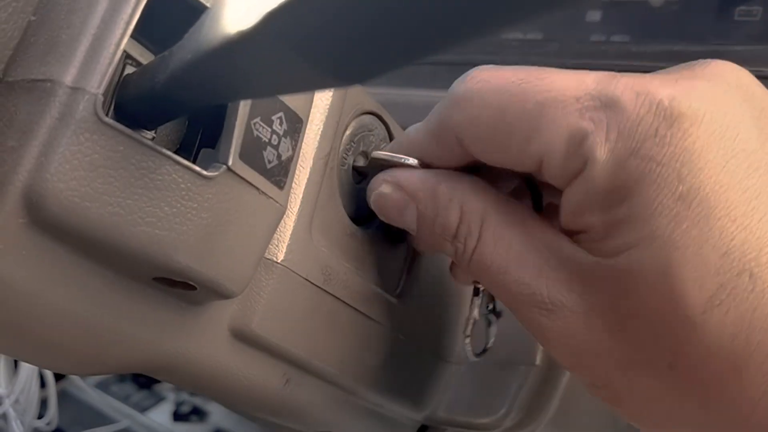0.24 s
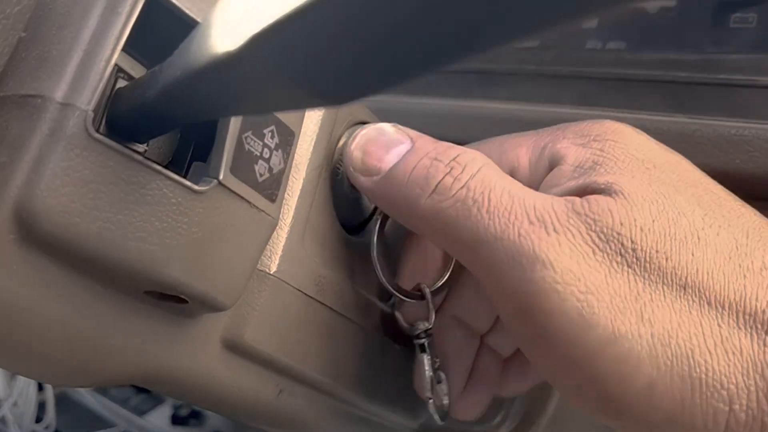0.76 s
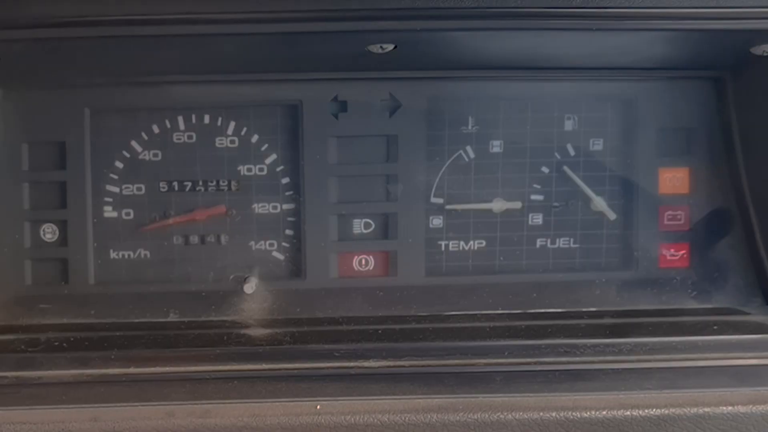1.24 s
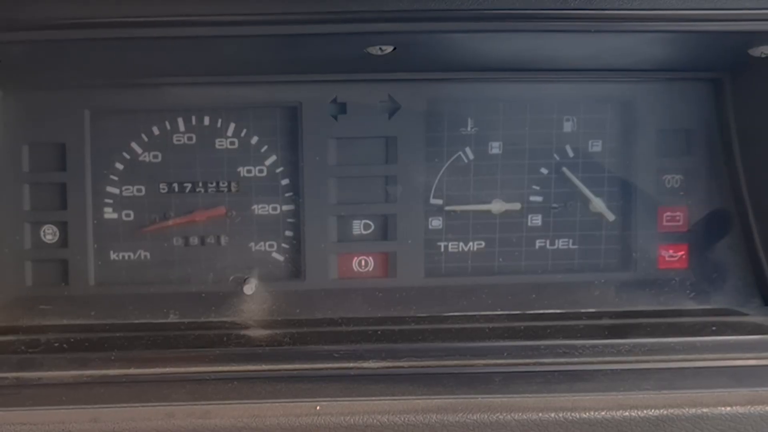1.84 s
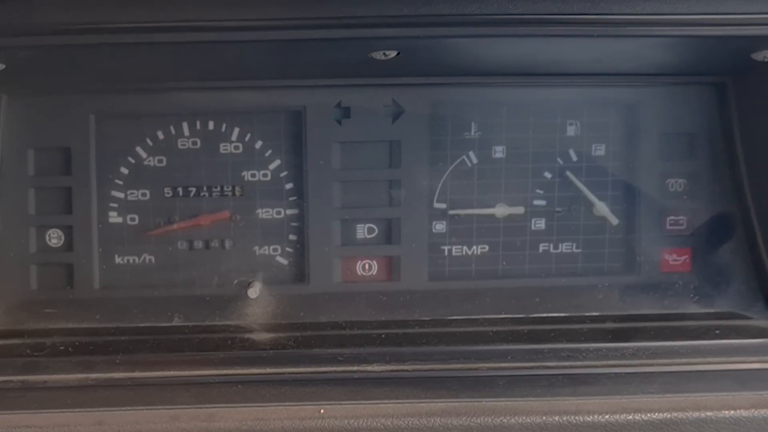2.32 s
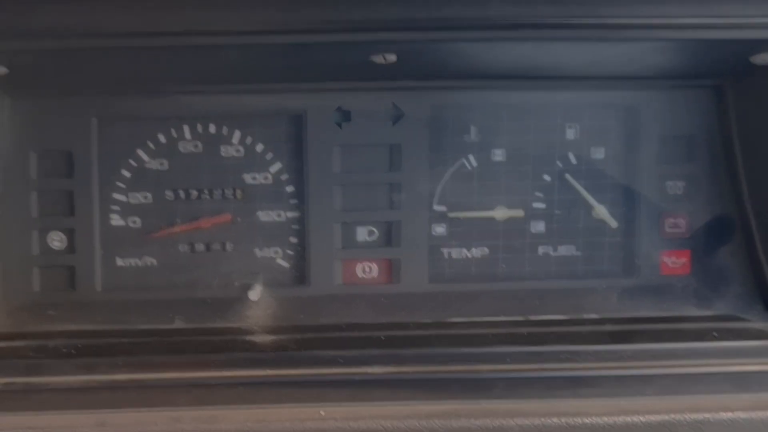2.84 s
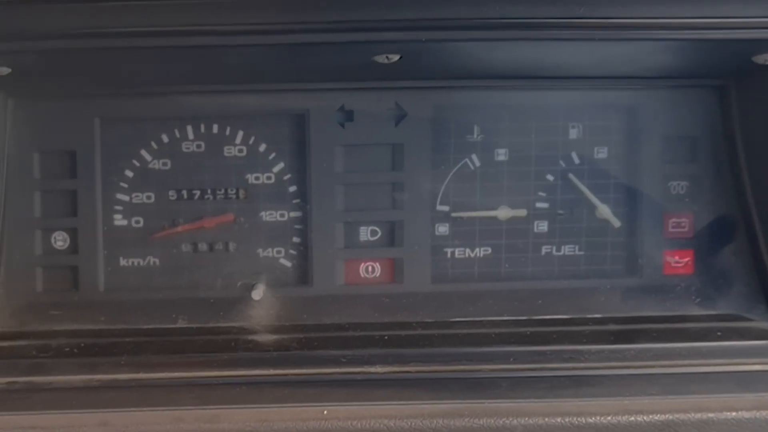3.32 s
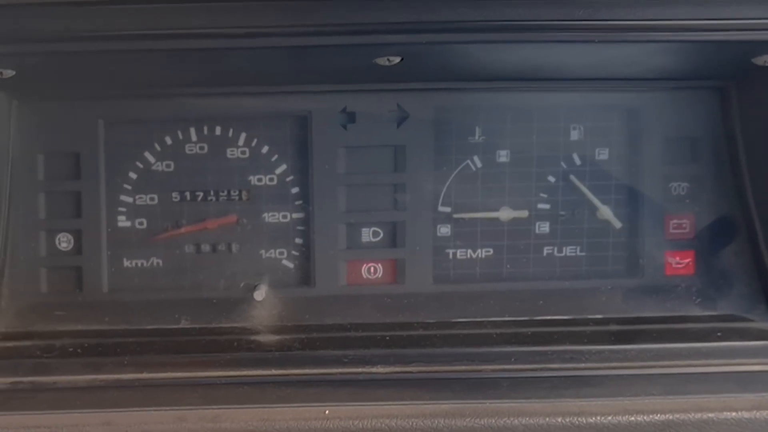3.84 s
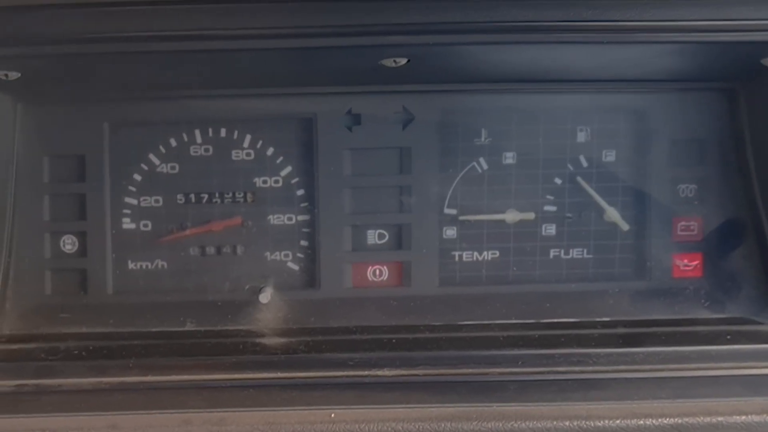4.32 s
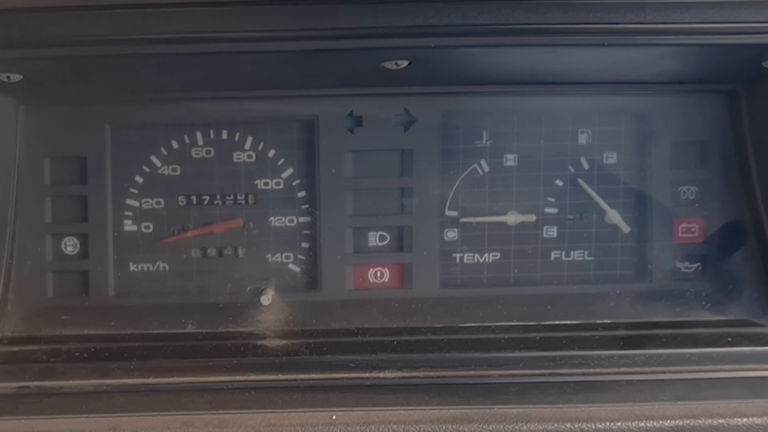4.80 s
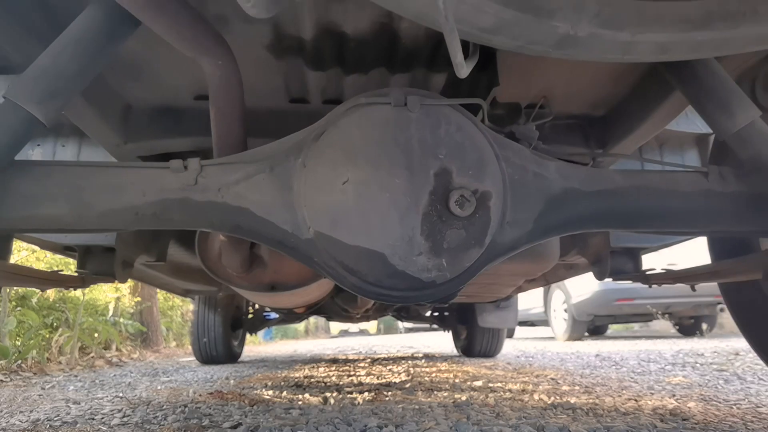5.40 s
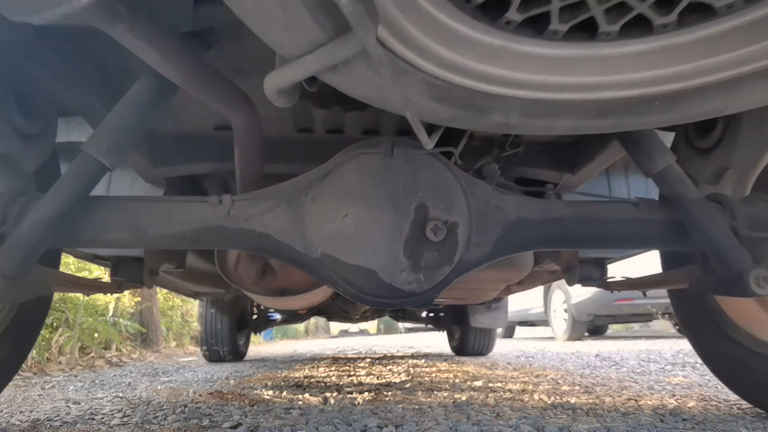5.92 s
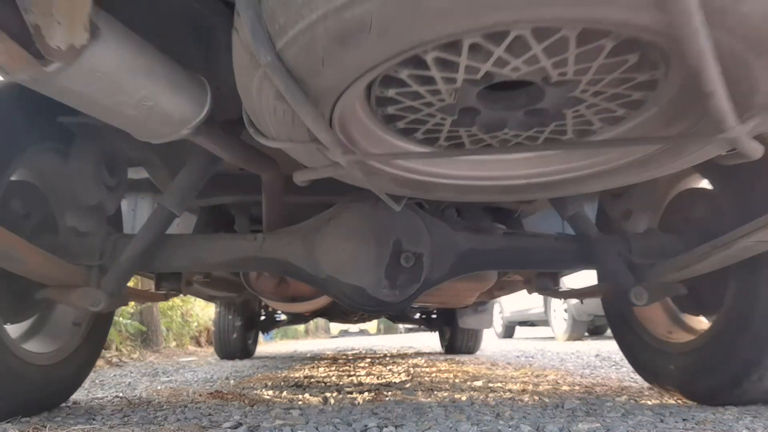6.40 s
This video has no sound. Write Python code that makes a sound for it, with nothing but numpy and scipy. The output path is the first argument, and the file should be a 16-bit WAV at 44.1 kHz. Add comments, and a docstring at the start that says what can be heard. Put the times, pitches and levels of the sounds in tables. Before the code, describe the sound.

Close inside an old van, a key and ring click faintly, then the switch snaps sharply. A relay clunks in the dashboard, the starter grinds briefly, and the engine catches with a booming flare. It sinks into a thudding idle with a loose tappet ticking. The final view crossfades beneath the rear axle, where exhaust drones and puffs among rattling metal.

```python
"""In the cab of an old van a key clicks in the ignition lock, a relay clunks in the dashboard, and the starter
whirrs briefly until the four-cylinder engine catches and settles to idle: body boom from firing harmonics, thud
and clatter from noise shaped by each stroke, a loose tappet from struck modes about once a cycle.
Near the end the cab crossfades to a view under the rear axle, with exhaust puffs close by."""
import sys
import numpy as np
from scipy import signal
from scipy.fft import rfft, irfft, next_fast_len
from scipy.io import wavfile
from scipy.ndimage import uniform_filter1d

SR = 44100
rng = np.random.default_rng(int(sys.argv[2]) if len(sys.argv) > 2 else 0)


def store_pcm(level_fs):
    """Save levels as 16-bit WAV."""
    pcm = np.round(np.clip(level_fs, -1, 1) * 32767).astype(np.int16)
    wavfile.write(sys.argv[1], SR, np.atleast_2d(pcm).T)


N = 293706
TIME = np.arange(N) / SR

# Colour of the murmur outside the van. Each row: frequency in Hz, relative gain in dB.
OUTSIDE_COLOUR = [(100, 3.5), (170, -12.5), (230, 14), (310, -7), (400, -3.5), (600, -10), (850, -5),
                  (1300, -14.5), (2100, -15), (3800, -27), (6000, -18.5), (7200, -19), (8400, -14),
                  (10500, -27.5), (12000, -38), (16000, -38)]
# Colour of the low rumble. Each row: frequency in Hz, relative gain in dB.
RUMBLE_COLOUR = [(20, -25), (50, 3.5), (80, 2), (130, -6), (220, -12), (400, -28.5)]
# Moments when the rumble swells. Each row: centre in seconds, half length in seconds, relative level in dB.
RUMBLE_SWELLS = [(0.286, 0.059, -41.5), (0.675, 0.028, -36), (0.85, 0.018, -38), (1.628, 0.056, -39)]
# The murmur drops when the relay clunks; in the view under the axle the background is weaker.
MURMUR_DB, MURMUR_DROP_DB, RUMBLE_DB, BACKGROUND_UNDER_DB = -44, -4, -39, -3

# Key, key ring and switch contacts, close in the cab. Each row: snap in seconds, relative level in dB,
# left minus right in dB, tail t60 in seconds, dashboard body in dB, bright edge in dB.
KEY_CLICKS = [(0.184, -44, 6, 0.04, 11, 21), (0.332, -40.5, 6, 0.045, 11, -12),
              (0.482, -24.5, 5.5, 0.033, -16, 6), (0.491, -34, 1, 0.2, -7, 3), (0.55, -27, 5, 0.12, 9, -14),
              (0.563, -38, 0, 0.074, 16, -14), (0.647, -35, 2, .025, -3, 2), (0.807, -25.5, 3, 0.08, -4, 9),
              (0.816, -26, 2, 0.12, 0, -3), (0.928, -32, 3.5, 0.13, 9.5, -8),
              (0.947, -31.5, 3, 0.12, -2, 0), (0.98, -31.5, 2, 0.1, 4.5, -10),
              (1.008, -45.5, 6, 0.066, 15.5, -10), (1.142, -19, 8, 0.023, 2.5, -2),
              (1.151, -8.5, -2, 0.048, -12, -12), (1.163, -17.5, -2, 0.12, -17, -20),
              (1.188, -11, 1, 0.092, -5.5, 4.5), (1.323, -39, 1, 0.25, 5, 10),
              (1.762, -18.5, -3, 0.088, -0.5, -20), (2.163, -12.5, 2, 0.092, -23, -16),
              (2.227, -26.5, 0, 0.11, 6.5, -6)]
# First the starter pinion on the ring gear, then probably the released key and its ring, later sharp metallic
# clashes. Each row: snap in seconds, relative level in dB, left minus right in dB, tail t60 in seconds,
# body in dB, bright edge in dB.
CLASHES = [(2.247, -12.5, -0.5, 0.16, 6, 1), (2.275, -9, -2, 0.076, 3, -6),
           (2.99, -14.5, 1, 0.25, -23, -10), (3.03, -22, 3, 0.17, -5, 0), (5.513, -18, -1, 0.08, 3, -8),
           (5.589, -13, 0, 0.08, 0.5, -11)]
# Colour of the lock steel in a click. Each row: frequency in Hz, relative gain in dB.
LOCK_COLOUR = [(3000, -26.5), (4350, -14), (4900, -3), (7000, 0), (8400, 6.5), (9600, -1), (11500, -16),
               (16000, -48)]
# Colour of the dashboard behind a click. Each row: frequency in Hz, relative gain in dB.
DASH_COLOUR = [(150, -5), (600, -2.5), (1000, -17), (1350, -4.5), (2000, -3), (2600, -2), (3600, -5),
               (5500, -7.5), (9000, -79)]
# Colour of a click's bright edge. Each row: frequency in Hz, relative gain in dB.
EDGE_COLOUR = [(7000, -30), (10500, -4), (12500, -1), (15000, 0), (16000, -2)]
# Ringing of the lock. Each row: frequency in Hz, width in Hz, relative level in dB.
LOCK_MODES = [(5400, 300, -6), (5910, 120, -1.5), (6600, 74, -7), (7900, 48, -18), (8550, 69, -20)]
# Ringing of the panel around a click. Each row: frequency in Hz, width in Hz, relative level in dB.
PANEL_MODES = [(1320, 73, 0), (1984, 56, 0), (2860, 16, 0)]
# A click is a crackle of tiny contacts of uneven strength; its bright edge dies first.
GRAINS_PER_S, GRAIN_SPREAD_DB, EDGE_FALL_DB_PER_S = 1400, 3, 120

# The lock barrel. Each row: frequency in Hz, relative level in dB, t60 in seconds.
BARREL_MODES = [(1330, -12, .13), (1850, 3, 0.085), (2110, 3, .11), (2853, -17, 0.11), (3408, -8, .05)]
# The switch detent. Each row: frequency in Hz, relative level in dB, t60 in seconds.
DETENT_MODES = [(1340, -4, .08), (1980, 0, .07), (2970, -5, .09), (3241, 3, .08), (3515, -1.5, 0.092),
                (4330, 4, .06)]
# The return spring of the ignition switch. Each row: frequency in Hz, level in dB, t60 in seconds.
SPRING_MODES = [(5050, -24, .06), (5250, -21, .06), (5520, -26, .05)]
# The key seats in the barrel. Each row: start in seconds, level in dB.
SEATINGS = [(0.551, -42), (0.563, -39)]
# The switch snaps over its detents. Each row: start in seconds, level in dB.
SNAPS = [(1.143, -45), (1.189, -32)]
SPRING_S = 2.163  # the key turns to start

# Relay clunk in the dashboard. Each row: frequency in Hz, relative level in dB, t60 in seconds.
CLUNK_MODES = [(142, -10, 0.36), (226, -4.5, 0.22), (314.6, -1, 0.21), (370, -3, 0.16), (612, -7.5, 0.087),
               (1040, -19.5, 0.24), (1970, -26, 0.25), (2050, -29, 0.4), (2110, -27, 0.25)]
# Colour of the loose dashboard trim. Each row: frequency in Hz, relative gain in dB.
TRIM_COLOUR = [(130, -1), (350, 7.0), (500, -7.5), (700, -3), (1100, -12), (2200, -16.0), (4500, -22.0)]
CLUNK_S, CLUNK_DB, TRIM_DB = 1.761, -17.5, -26.5

# Starter speed. Each row: time in seconds, mean gear mesh in Hz.
MESH = [(2.25, 790), (2.33, 740), (2.415, 657), (2.45, 1040), (2.515, 1012), (2.555, 809), (2.585, 784),
        (2.62, 645)]
# Compressions that load the starter. Each row: centre in seconds, half length in seconds, load in dB.
COMPRESSIONS = [(2.28, 0.019, -2), (2.393, 0.027, -3.5), (2.563, 0.024, 0.5)]
# The pinion scrapes as it overruns between compressions.
# Each row: centre in seconds, half length in seconds, level in dB.
OVERRUNS = [(2.362, .025, -35), (2.525, 0.038, -32.5)]
# Harmonics of the gear whine. Each row: multiple of the mesh rate, mean relative level in dB.
WHINE_HARMONICS = [(1, 0), (2, -1), (3, -10)]
# Colour of the starter housing. Each row: frequency in Hz, relative gain in dB.
HOUSING_COLOUR = [(600, 4), (780, 8), (1030, -1), (1350, -1), (1620, 0), (2050, 4), (2500, -10)]
# Colour of the grinding teeth. Each row: frequency in Hz, relative gain in dB.
GRIND_COLOUR = [(300, -42), (600, 2), (780, 12), (980, -2), (1380, 2), (1700, -2), (2300, -13), (3500, -15)]
# Ringing of the ring gear. Each row: frequency in Hz, width in Hz, relative level in dB.
RING_GEAR_MODES = [(3080, 130, -1), (4100, 200, -3), (4750, 200, -3), (5200, 170, 3), (5780, 170, 7)]
PINION_TEETH = 9
# Starter gears: dB running free, dB added as gain in proportion to load.
WHINE_DB, GRIND_DB, SCRAPE_DB = (-37, -32), (-43, -30), (-42, -41)
START_S, STARTER_HOLD_S, RUN_DOWN_DB_PER_S = 2.25, 0.335, 200
# Armature hum: strong while the motor breaks the engine loose.
HUM_HZ, HUM_DB, HUM_LOAD_DB = 151, -16.5, -32.5
HUM_RISE_S, HUM_HOLD_S, HUM_FALL_DB_PER_S = 0.043, 0.052, 225

# Engine speed in firings per second: runs up from cranking, flares, sinks to idle, later picks up a little.
CRANK_RATE, FLARE_RATE, IDLE_RATE, FAST_IDLE_RATE = 9.671, 28.148, 24.222, 26.661
RUN_UP_S, SINK_S, PICK_UP_S, PICK_UP_LENGTH_S = 0.5, 0.568, 5.633, 0.788
# Engine effort: the cylinders catch, pull hard through the flare, then ease off.
CATCH_S, CATCH_LENGTH_S, EASE_S, EASE_LENGTH_S = 2.585, 0.16, 3.19, 0.22
# Levels in the cab: dB at cranking, flare and idle.
BOOM_DB, THUD_DB, CLATTER_DB = (-30.5, -15.5, -18), (-33.5, -23.5, -28.5), (-40.5, -40.5, -41.5)
WHIRR_DB = (-60, -46, -50.5)  # valve gear whirring in the cover
VALVES_DB, SHAKE_DB, THUD_SCATTER_DB = -50, -38.5, 3
# The block jolts on its mounts as the starter takes hold.
JOLT_DB, JOLT_FALL_DB_PER_S = -20, 116
# Boom in the cab. Each row: multiple of the firing rate, mean relative level in dB.
CAB_ORDERS = [(1, -23), (2, 3), (3, 3), (5, -1), (7, -13), (8, -24.5), (9, -26)]
# Colour of the block's thud in the cab. Each row: frequency in Hz, relative gain in dB.
CAB_THUD_COLOUR = [(25, -20), (45, 0), (90, 2.5), (160, 4.5), (230, -2), (360, -12), (460, -21.5),
                   (580, -16), (900, -50), (1500, -56.5)]
# Colour of the block's clatter in the cab. Each row: frequency in Hz, relative gain in dB.
CAB_CLATTER_COLOUR = [(400, 3.5), (800, 5.5), (1300, -1.5), (1800, 3), (2700, -2.5), (3900, -9.5),
                      (5800, -6), (8300, -3.5), (10000, -11.5), (12000, -26), (16000, -37)]
# Colour of the shaken cab floor. Each row: frequency in Hz, relative gain in dB.
SHAKE_COLOUR = [(150, -6), (230, 0), (290, -4), (350, -2), (440, -17)]
# Colour of the valve contacts. Each row: frequency in Hz, relative gain in dB.
VALVE_COLOUR = [(1900, 1.0), (2400, 7.0), (3200, 4.0), (3900, -21)]
# Ringing of the tappet cover. Each row: frequency in Hz, width in Hz, relative level in dB.
COVER_MODES = [(1686, 47, 7), (1765, 44, 6), (1576, 63, 1.5), (2290, 240, -20)]

# Colour of the intake hiss. Each row: frequency in Hz, relative gain in dB.
INTAKE_COLOUR = [(1500, -16), (3000, -16), (4200, -17.5), (5200, -9.5), (6200, -4), (7000, -9.5),
                 (7900, -1.5), (9500, -11.5), (11000, -20.5), (12200, -35), (16000, -38)]
# Brief hiss swells: two around the starter, then probably the key springing back and its ring sliding.
# Each row: centre in seconds, half length in seconds, level in dB.
HISS_SWELLS = [(2.381, 0.037, -33.5), (2.515, 0.052, -26), (3.042, 0.04, -29.5)]
# Intake hiss: loud while cranking, steady through the flare, then dying away.
HISS_CRANK_DB, HISS_FLARE_DB, HISS_FADES_S, HISS_FALL_DB_PER_S = -29.5, -31, 2.947, 22

# Tailpipe drone. Each row: multiple of the firing rate, mean relative level in dB.
TAIL_ORDERS = [(2, -24), (3, -5), (4, -9.5), (5, 3), (6, -4.5), (7, -3), (9, -9), (10, -19), (12, -14)]
# Colour of the exhaust puffs. Each row: frequency in Hz, relative gain in dB.
PUFF_COLOUR = [(50, -46), (95, -5), (150, 0.5), (230, -4), (330, -7.5), (420, -17), (520, -12),
               (720, -20.5), (950, -26), (1600, -27)]
# Colour of the clatter under the axle. Each row: frequency in Hz, relative gain in dB.
TAIL_CLATTER_COLOUR = [(400, 1), (900, -4), (1250, 6), (1600, 3.5), (2080, 6), (2600, 4), (3200, 2.5),
                       (4000, 1.5), (6000, -40)]
# Colour of the gas hiss. Each row: frequency in Hz, relative gain in dB.
TAIL_HISS_COLOUR = [(2500, -56), (4000, -10), (5600, -1), (7000, 1), (8500, 2.5), (10000, -4), (12000, -16),
                    (16000, -23.5)]
# Ringing of the underbody sheet metal. Each row: frequency in Hz, width in Hz, relative level in dB.
SHEET_MODES = [(502, 29, 8), (654, 57, 6.5), (775, 41, 3.5), (1094, 37, 5), (1710, 23, 0.5), (2090, 45, -6)]
# Brackets and heat shield under the floor. Each row: frequency in Hz, width in Hz, relative level in dB.
BRACKET_MODES = [(1340, 130, -5), (1530, 90, -1), (1800, 200, -1), (2060, 110, 4), (2230, 200, -1),
                 (2560, 160, -5), (2950, 250, -7)]
DRONE_DB, PUFFS_DB, TAIL_CLATTER_DB, SHEET_DB, KNOCKS_DB = -18, -21.5, -39.5, -33, -31.3  # before the mix
# While the two views overlap, the strokes underneath lag those in the cab; the lag then closes.
UNDER_LAG_FIRINGS, LAG_CLOSES_S, LAG_CLOSING_LENGTH_S = 0.38, 5.31, 0.23

# Ticks of the loose tappet, some with a second tick after them.
# Each row: start in seconds, relative tick level in dB, relative floor thump in dB.
TICKS = [(2.9484, -31.5, -31), (2.9846, -36, -30), (3.019, -35, -36), (3.1457, -35, -26),
         (3.1806, -41, -27), (3.3083, -32, -21), (3.4764, -35, -21.5), (3.6423, -33.5, -24),
         (3.677, -36, -40), (3.8087, -30.5, -22), (3.9733, -29.5, -24), (4.1372, -29, -24),
         (4.3006, -36, -24), (4.4678, -29, -23), (4.631, -37, -31), (4.6707, -34.5, -37), (4.985, -30, -30),
         (5.0318, -30, -31), (5.1135, -27, -26)]
# The cab floor, thumped with each tick. Each row: mean frequency in Hz, relative level in dB, t60 in seconds.
FLOOR_MODES = [(232, 0, .11), (335, -6, .1), (385, -11, .08)]
TAPPET_RISE_S, TAPPET_T60_S, TAPPET_DETUNE = 0.002, 0.085, 0.012  # detune as a fraction

# Crossfade from the cab to a view under the rear axle; the underside then grows weaker.
UNDER_S, UNDER_FADE_S, UNDER_LEAK_DB = 4.67, 0.86, -40
CAB_OUT_S, CAB_FADE_S, CAB_LEAK_DB = 5.51, 0.097, -25
UNDER_DB, UNDER_WEAKENS_DB = 0.5, -2.5
TOP_HZ = 16400


def undb(db):
    """Decibels to gain."""
    return 10 ** (np.asarray(db) / 20)


def unit(x):
    """Scale to rms 1."""
    return x / np.sqrt(np.mean(x ** 2) + 1e-18)


def pan(db):
    """Left and right gains for a left minus right level difference."""
    return undb(np.array([[db], [-db]]) / 2)


def ramp(start, length):
    """A straight rise from 0 to 1."""
    return np.clip((TIME - start) / length, 0, 1)


def envelope(start, attack, hold, fall_db_per_s):
    """Attack, hold and an even decay."""
    return ramp(start, attack) * undb(-fall_db_per_s * np.maximum(TIME - start - attack - hold, 0))


def swells(table):
    """Smooth rises and falls around the listed moments."""
    return sum(undb(db) * np.exp(-((TIME - s) / half_length) ** 2) for s, half_length, db in table)


def noise(side, size=N):
    """Stereo white noise; side 0 is centred, 1 is unrelated left and right."""
    mid, wide = rng.standard_normal((2, size))
    return unit(mid + side * wide * np.array([[1], [-1]]))


def walk(rate):
    """Slow random curve of rms 1, with about rate new values per second."""
    step = int(SR / rate)
    held = np.repeat(rng.standard_normal(N // step + 1), step)
    return unit(uniform_filter1d(uniform_filter1d(held, step), step)[:N])


def rattle(density, spread_db):
    """Sparse contacts, density per second, of very uneven strength."""
    strength = undb(spread_db * np.clip(rng.standard_normal(N), -2, 2))
    hits = (rng.random(N) < density / SR) * strength
    return unit(hits * noise(1.0))


def colour(x, points):
    """Causal filter through (Hz, dB) points, falling steeply outside them; white noise keeps its power."""
    size = 2 * next_fast_len(x.shape[-1] // 2 + 4096)
    octave = np.log2(np.maximum(np.arange(size // 2 + 1) * SR / size, 1))
    hz, db = np.transpose(points)
    outside = np.abs(octave - np.clip(octave, np.log2(hz[0]), np.log2(hz[-1])))
    gain = unit(undb(np.interp(octave, np.log2(hz), db) - np.minimum(18 * outside, 50)))
    # folding the cepstrum makes the filter minimum phase
    cepstrum = irfft(np.log(gain))
    fold = np.r_[1, np.full(size // 2 - 1, 2), 1, np.zeros(size // 2 - 1)]
    return irfft(rfft(x, size) * np.exp(rfft(cepstrum * fold)))[..., :x.shape[-1]]


def ring(x, modes):
    """Narrow resonances struck by the same drive."""
    return sum(undb(db) * signal.lfilter(*signal.iirpeak(hz, hz / width, SR), x) for hz, width, db in modes)


def ping(s, modes, detune=0):
    """One blow on a part with (Hz, dB, t60 s) modes; with detune each blow shifts their pitch a little."""
    out = np.zeros((2, N))
    age = TIME[:SR // 4]
    start = int(s * SR)
    for hz, db, t60 in modes:
        shift, turn, apart = rng.standard_normal(3)
        phase = 2 * np.pi * (hz * (1 + detune * shift) * age + turn)
        phase = phase + min(hz / 2000, 1) * apart * np.array([[1], [-1]])  # differs left and right
        onset = np.minimum(hz * age, 1)
        out[:, start:start + len(age)] += undb(db - 60 * age / t60) * np.sin(phase) * onset
    return out


def scatter(x, t60, wet):
    """Close reflections from hard surfaces, different at each ear."""
    age = TIME[:SR // 8]
    response = noise(0.23, size=len(age)) * undb(-60 * age / t60)
    response *= wet / np.sqrt(np.sum(response ** 2) / 2)
    response[:, 0] += 1  # direct sound
    return signal.fftconvolve(x, response, axes=1)[:, :N] / np.hypot(1, wet)


def speed():
    """Firings per second: run-up, sinking to idle, pick-up."""
    run_up = (FLARE_RATE - CRANK_RATE) * ramp(START_S, RUN_UP_S)
    sink = (IDLE_RATE - FLARE_RATE) * ramp(START_S + RUN_UP_S, SINK_S)
    pick_up = (FAST_IDLE_RATE - IDLE_RATE) * ramp(PICK_UP_S, PICK_UP_LENGTH_S)
    return CRANK_RATE + run_up + sink + pick_up


def effort(levels_db):
    """Gain of an engine layer through cranking, flare and idle."""
    cranking, flare, idle = levels_db
    catch_db = (flare - cranking) * ramp(CATCH_S, CATCH_LENGTH_S)
    ease_db = (idle - flare) * ramp(EASE_S, EASE_LENGTH_S)
    return ramp(START_S, 0.025) * undb(cranking + catch_db + ease_db)


def strokes(firings, lag, rise, fall, cylinder_db, scatter_db, bed):
    """One swell and decay per firing over a steady bed, times in firings; each cylinder has its own strength."""
    index = np.floor(firings - lag + 4).astype(int)
    age = (firings - lag) % 1
    chance_db = scatter_db * rng.standard_normal(512)[index % 512]
    size = undb(np.array(cylinder_db)[index % 4] + chance_db)
    return unit(abs(bed) + size * (1 - np.exp(-age / rise)) * np.exp(-age / fall))


def tones(firings, orders, lag, waver_db, delay):
    """Harmonics of the firing rate that waver a little; the pipe lets the higher ones arrive later."""
    total = 0
    for k, db in orders:
        phase = 2 * np.pi * round(k) * (firings - lag - delay * k)
        total = total + undb(db + waver_db * walk(8.3)) * np.cos(phase)
    return unit(total)


def background():
    """Soft outdoor murmur and an uneven low rumble, both coloured noise."""
    murmur_db = MURMUR_DB + MURMUR_DROP_DB * ramp(CLUNK_S, 0.05)
    murmur = undb(murmur_db + 1.04 * walk(6.8)) * colour(noise(0.85), OUTSIDE_COLOUR)
    rumble_level = undb(RUMBLE_DB + 3.2 * walk(13.85)) + swells(RUMBLE_SWELLS)
    return murmur + rumble_level * colour(noise(0.16), RUMBLE_COLOUR)


def clicks(table, scrape_s, scrape_db, crack_s, tail_db, ring_db):
    """Metal slides, then snaps home: crack and tail excite the steel, its bright edge and the panel around it."""
    drive = np.zeros((3, 2, N))  # steel, body, edge
    lead = SR // 30
    age = TIME[:SR // 3] - lead / SR
    for s, db, pan_db, t60, body_db, edge_db in table:
        after = np.exp(-abs(age) / crack_s) + undb(tail_db - 60 * abs(age) / t60)
        before = undb(scrape_db) * np.exp(-abs(age) / scrape_s)
        contacts = np.repeat(rng.standard_normal(len(age)), SR // GRAINS_PER_S)[:len(age)]
        grain = unit(undb(GRAIN_SPREAD_DB * np.clip(contacts, -2, 1.5)))
        shape = np.where(age < 0, before, after)
        burst = noise(1, size=len(age)) * grain * shape * undb(db) * pan(pan_db)
        edge_fade = undb(-EDGE_FALL_DB_PER_S * np.maximum(age, 0))
        start = int(s * SR) - lead
        parts = np.array([burst, undb(body_db) * burst, undb(edge_db) * edge_fade * burst])
        drive[:, :, start:start + len(age)] += parts
    steel, body = colour(drive[0], LOCK_COLOUR), colour(drive[1], DASH_COLOUR)
    steel = steel + undb(ring_db) * ring(steel, LOCK_MODES)
    body = body + undb(ring_db) * ring(body, PANEL_MODES)
    edge = colour(drive[2], EDGE_COLOUR)
    return undb(-12.0) * steel + undb(-22) * body + undb(-23) * edge


def lock():
    """The barrel rings as the key seats, the detents snap over, and the return spring pings."""
    barrel = sum(undb(db) * ping(s, BARREL_MODES) for s, db in SEATINGS)
    detent = sum(undb(db) * ping(s, DETENT_MODES, detune=0.012) for s, db in SNAPS)
    return barrel + detent + ping(SPRING_S, SPRING_MODES)


def clunk():
    """The relay pulls in: the dashboard rings and its loose trim buzzes briefly."""
    age = np.maximum(TIME - CLUNK_S, 0)
    started = age > 0
    modes = 0
    for k, (hz, db, t60) in enumerate(CLUNK_MODES):
        wavering_age = age + 0.000093 * walk(70)
        modes = modes + (-1) ** k * undb(db - 60 * age / t60) * np.sin(2 * np.pi * hz * wavering_age)
    trim = colour(noise(1.0) * np.exp(-age / 0.042) * started, TRIM_COLOUR)
    return undb(CLUNK_DB) * modes * started + undb(TRIM_DB) * trim


def starter():
    """The armature hums under load; teeth whine, grind and scrape at compressions, then run down on firing."""
    mesh_hz = np.interp(TIME, *np.transpose(MESH))
    load = swells(COMPRESSIONS)
    turning = envelope(START_S, 0.0078, STARTER_HOLD_S, RUN_DOWN_DB_PER_S)
    # the teeth chatter under load and run more smoothly while the pinion freewheels
    chatter = 0.014 + 0.05 * load
    tooth = 2 * np.pi * np.cumsum(mesh_hz * (1 + chatter * walk(350))) / SR
    # the worn pinion bites harder once a turn
    bite = (1 + 0.4 * np.sin(tooth / PINION_TEETH)) * undb(1.8 * walk(200))
    harmonics = sum(undb(db + 2.2 * walk(90)) * np.sin(k * tooth) for k, db in WHINE_HARMONICS)
    whine = unit(colour(harmonics, HOUSING_COLOUR) * bite)
    whine = scatter(np.array([whine, whine]), t60=0.06, wet=0.45)
    grinding = unit(rattle(7000, 1.5) * bite * (1 + 0.83 * np.sin(tooth)))
    grind = colour(grinding, GRIND_COLOUR)
    scrape = unit(ring(rattle(2500, 2.2) * bite, RING_GEAR_MODES))
    gears = 0
    for layer, (free_db, loaded_db) in [(whine, WHINE_DB), (grind, GRIND_DB), (scrape, SCRAPE_DB)]:
        gears = gears + layer * (undb(free_db) + undb(loaded_db) * load)
    overrun = scrape * swells(OVERRUNS)
    hum = unit(np.sin(2 * np.pi * np.cumsum(HUM_HZ * (1 + 0.014 * walk(40.4))) / SR))
    surge = undb(HUM_DB) * envelope(START_S, HUM_RISE_S, HUM_HOLD_S, HUM_FALL_DB_PER_S)
    current = surge + undb(HUM_LOAD_DB) * load
    return turning * gears + overrun + current * hum


def cab(firings):
    """Inside: the body booms on the firings, the block thuds and clatters, and one loose tappet knocks."""
    settled = ramp(CATCH_S + CATCH_LENGTH_S, 0.14)
    ear_lag = np.array([[0.008], [0]])  # in firings; the boom reaches the left side later
    ragged = (0.019 + 0.12 * (1 - settled)) * walk(25)  # in firings; the first ones are ragged
    boom = tones(firings - ear_lag + ragged, CAB_ORDERS, lag=0.252, waver_db=1.5, delay=0.013)
    lean_db = 1.5 + 5.0 * ramp(EASE_S, 0.79)  # at idle the boom leans further to the left
    boom = boom * effort(BOOM_DB) * undb(np.outer([1, -1], lean_db) / 2)
    thudding = strokes(firings, 0.77, 0.091, 1.0, [-3, -6, -3, -2], THUD_SCATTER_DB, 0.5)
    thud = colour(noise(0.24) * thudding, CAB_THUD_COLOUR) * pan(1.1)
    # one cylinder shakes the floor harder than the rest
    shaking = strokes(firings, 0.72, 0.3, 0.5, [-10, 0, -9, -16], 1.5, 0.02)
    shake = colour(noise(0.35) * shaking, SHAKE_COLOUR) * pan(3)
    clattering = strokes(firings, 0.51, 0.17, 0.47, [1.5, 2.4, 4.9, 2.9], 1.0, 0.11)
    clatter = scatter(colour(noise(1) * clattering, CAB_CLATTER_COLOUR), t60=0.055, wet=0.87)
    valve_strokes = strokes(firings, 0.83, 0.079, 0.43, [1, 10.8, 7.2, 6.0], 2.8, 0.03)
    valves = colour(rattle(6000, 1.0) * valve_strokes, VALVE_COLOUR)
    whirring = strokes(firings, 0.85, 0.03, 0.25, [-5, 0, -3, -6], 2, 0.1)
    whirr = unit(ring(rattle(4000, 3) * whirring, COVER_MODES))
    valve_gear = settled * (effort(WHIRR_DB) * whirr + undb(VALVES_DB) * valves) + tappet()
    jolt = undb(JOLT_DB) * envelope(START_S, 0.013, 0.0046, JOLT_FALL_DB_PER_S)
    block = (jolt + effort(THUD_DB)) * thud + effort(CLATTER_DB) * clatter
    return boom + block + undb(SHAKE_DB) * settled * shake + valve_gear


def intake_hiss(firings):
    """Coloured noise hisses at each stroke, a little unevenly, then dies away; brief swells stand out."""
    drawing = strokes(firings, 0.33, 0.15, 0.45, [0, 0, 0, 0], 0.5, 2.1)
    hiss = scatter(colour(noise(0.96) * drawing, INTAKE_COLOUR), t60=0.06, wet=0.87)
    flow_db = HISS_CRANK_DB + (HISS_FLARE_DB - HISS_CRANK_DB) * ramp(CATCH_S - 0.08, 0.068)
    flow = undb(flow_db) * envelope(START_S, 0.0091, HISS_FADES_S - START_S, HISS_FALL_DB_PER_S)
    return (flow + swells(HISS_SWELLS)) * undb(1.07 * walk(90)) * hiss * pan(-0.4)


def underside(firings):
    """Under the axle: the tailpipe drones and puffs, gas hisses at each stroke, brackets and sheet metal rattle."""
    lagging = firings - UNDER_LAG_FIRINGS * (1 - ramp(LAG_CLOSES_S, LAG_CLOSING_LENGTH_S))
    steady = firings + 0.011 * walk(25)
    drone = tones(steady, TAIL_ORDERS, lag=0.37, waver_db=2.5, delay=0.0056)
    puffing = strokes(lagging, 0.23, 0.03, 0.83, [-1.5, 0.5, -9.5, -1.0], 0.86, 0.99)
    puffs = scatter(colour(noise(0.2) * puffing, PUFF_COLOUR), t60=0.087, wet=0.2)
    loose = lagging + 0.035 * walk(30)  # uneven stroke timing
    clattering = strokes(loose, 0.085, 0.11, 0.45, [-1, 0, 1, 1], 1.7, 0.16)
    clatter = colour(rattle(4000, 2) * clattering, TAIL_CLATTER_COLOUR)
    shaking = strokes(loose, 0.08, 0.08, 0.28, [-1, 0, 1, 1], 1.5, 0.08)
    # each contact lands somewhere else, so the modes take turns
    sheet = unit(sum(ring(rattle(3000, 2.5) * shaking * undb(3 * walk(30)), [mode]) for mode in SHEET_MODES))
    hissing = strokes(loose, 0.96, 0.23, 0.36, [0, -0.5, 1, 0], 2, 0.09)
    hiss = scatter(colour(rattle(7000, 0.41) * hissing, TAIL_HISS_COLOUR), t60=0.04, wet=0.25)
    hiss_db = -30.3 - 1.0 * ramp(CAB_OUT_S, 0.62)  # the hiss eases slightly once the cab fades
    exhaust = undb(DRONE_DB) * drone + undb(PUFFS_DB) * puffs
    metal = undb(TAIL_CLATTER_DB) * clatter + undb(SHEET_DB) * sheet + knocks(loose)
    return exhaust * pan(0.98) + metal * pan(2.5) + undb(hiss_db) * hiss * pan(1)


def knocks(firings):
    """Loose brackets chatter at each firing; now one part rings loudest, now another."""
    parts = 0
    for mode in BRACKET_MODES:
        own = firings + 0.05 * walk(30)
        shaking = strokes(own, 0.12, 0.09, 0.26, [0, -1, 1, 0], 2.2, 0.05)
        parts = parts + ring(rattle(3000, 1.5) * shaking * undb(3.6 * walk(28)), [mode])
    return undb(KNOCKS_DB) * unit(parts)


def tappet():
    """Each tick rings the valve cover a little differently and thumps the cab floor."""
    ticks = np.zeros((2, N))
    age = TIME[:SR // 6]
    shape = (1 - np.exp(-age / TAPPET_RISE_S)) * undb(-60 * age / TAPPET_T60_S)
    for s, db, _ in TICKS:
        cover = 0
        for hz, _, mode_db in COVER_MODES:
            detune, share, left, right = rng.standard_normal(4)
            phase = 2 * np.pi * hz * (1 + TAPPET_DETUNE * detune) * age + 0.7 * np.array([[left], [right]])
            cover = cover + undb(mode_db + 2 * share) * np.sin(phase)
        start = int(s * SR)
        tick = unit(shape * cover) * np.sqrt(np.mean(shape ** 2))
        ticks[:, start:start + len(age)] += undb(db) * tick
    thumps = sum(undb(thump_db) * ping(s, FLOOR_MODES, detune=0.029) for s, _, thump_db in TICKS)
    return ticks * pan(1.4) + thumps * pan(2)


def scene():
    """Key, relay, starter, then the running engine in two crossfaded views."""
    firings = np.cumsum(speed()) / SR  # running count
    cab_out = ramp(CAB_OUT_S, CAB_FADE_S)
    around = background() * undb(BACKGROUND_UNDER_DB * cab_out)
    key = clicks(KEY_CLICKS, scrape_s=0.0035, scrape_db=1.5, crack_s=0.0063, tail_db=3.5, ring_db=4.5)
    clashes = clicks(CLASHES, scrape_s=0.0038, scrape_db=4.5, crack_s=0.014, tail_db=-0.5, ring_db=-1)
    inside = np.maximum(1 - cab_out, undb(CAB_LEAK_DB))
    leak = undb(UNDER_LEAK_DB) * ramp(CATCH_S, CATCH_LENGTH_S)
    under_db = UNDER_DB + UNDER_WEAKENS_DB * ramp(CAB_OUT_S, 1)
    under = np.maximum(ramp(UNDER_S, UNDER_FADE_S), leak) * undb(under_db)
    engine = inside * (cab(firings) + intake_hiss(firings)) + under * underside(firings)
    return around + key + lock() + clunk() + clashes + starter() + engine


def record(dry):
    """The recorder rounds the sharpest peaks and cuts the top."""
    rounded = dry / (1 + (dry / 0.78) ** 6) ** (1 / 6)
    return signal.sosfilt(signal.ellip(10, 0.2, 80, TOP_HZ, fs=SR, output="sos"), rounded)


dry = scene()
out = record(dry)
store_pcm(out)
```